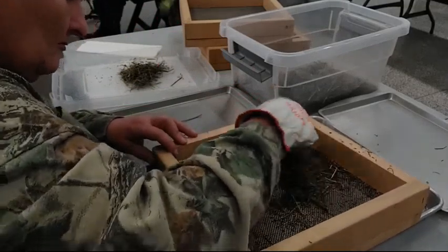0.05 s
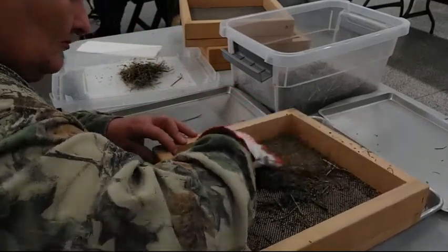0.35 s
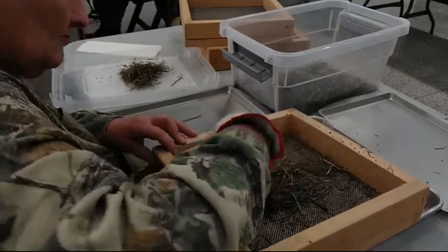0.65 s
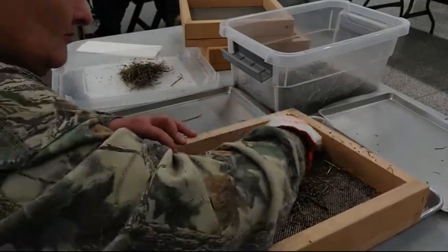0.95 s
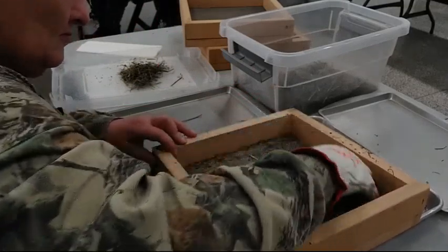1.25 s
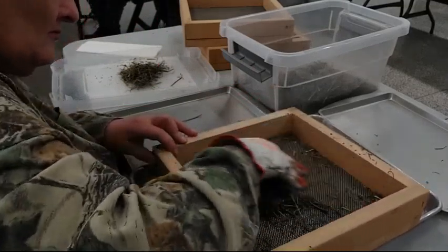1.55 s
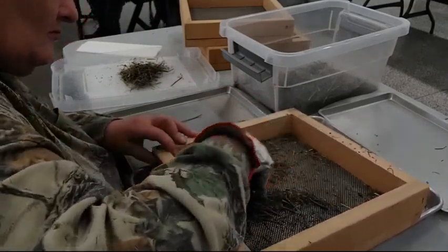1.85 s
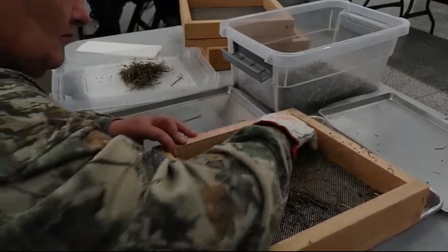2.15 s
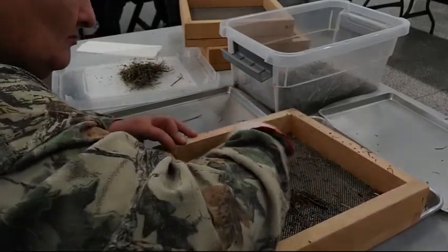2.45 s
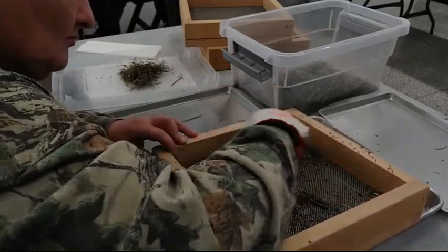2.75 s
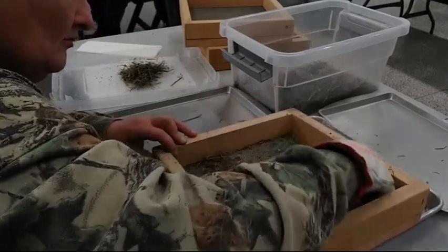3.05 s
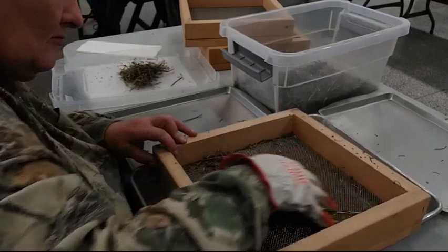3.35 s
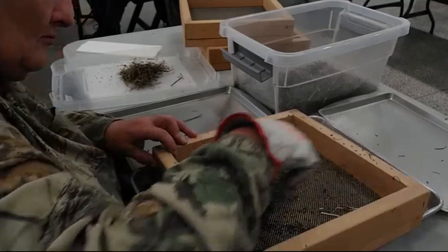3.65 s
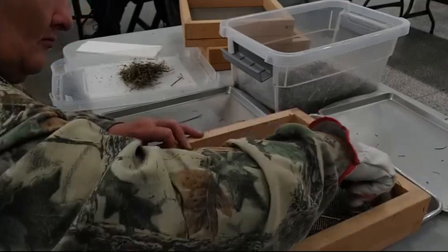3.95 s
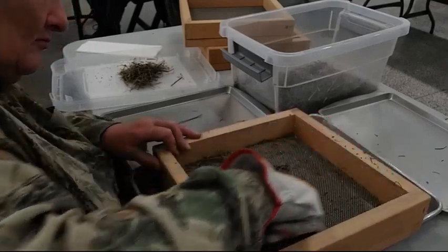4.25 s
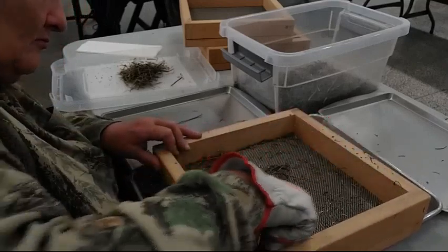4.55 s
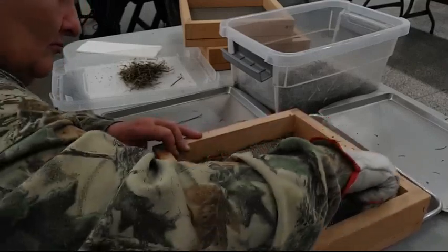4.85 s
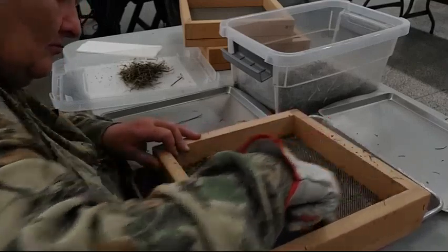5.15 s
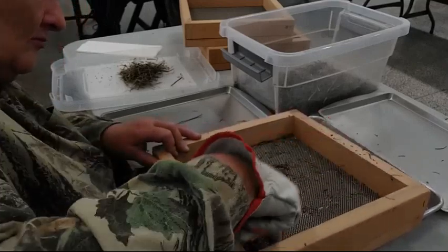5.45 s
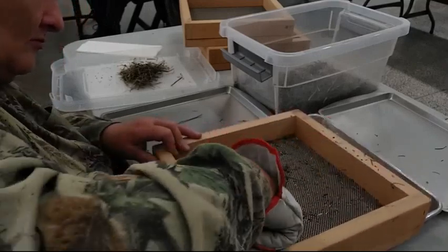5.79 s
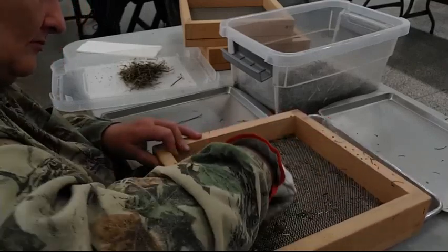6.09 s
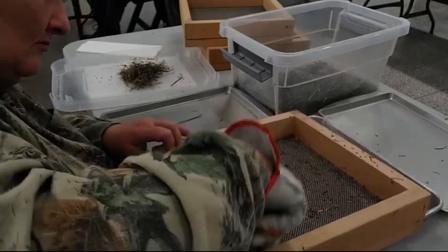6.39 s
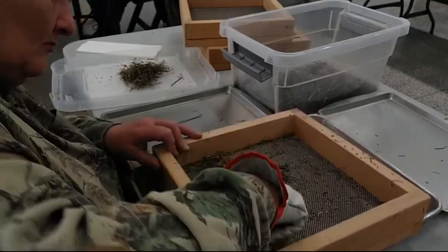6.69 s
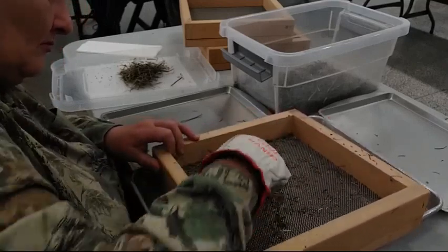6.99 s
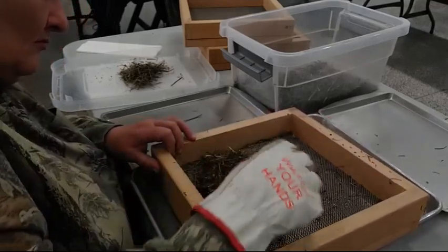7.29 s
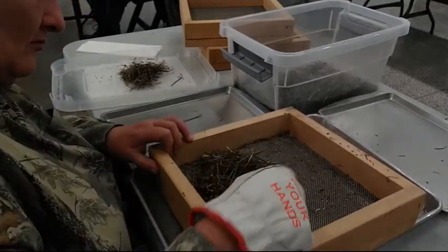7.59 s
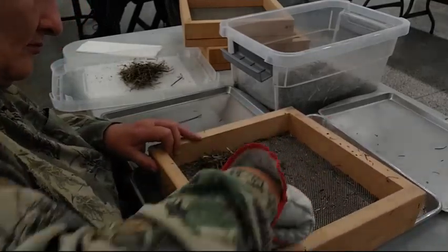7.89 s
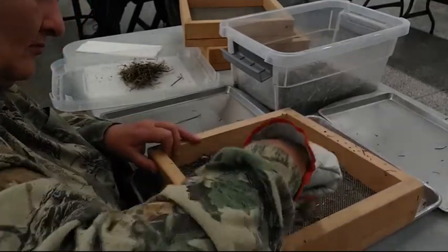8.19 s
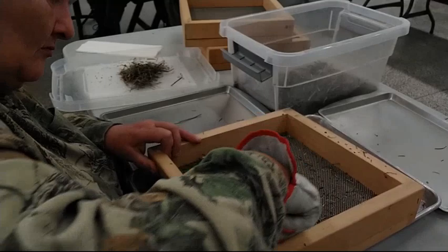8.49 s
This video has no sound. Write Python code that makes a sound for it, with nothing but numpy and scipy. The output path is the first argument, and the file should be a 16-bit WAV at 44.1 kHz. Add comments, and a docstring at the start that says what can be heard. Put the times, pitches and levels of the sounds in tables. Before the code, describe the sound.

A gloved hand rubs dried seed heads back and forth over a wire screen in a wooden frame. Husks crackle and stalks rasp in uneven strokes, loudest early on with a few sharp snaps. The frame then knocks once on a metal tray, and softer strokes follow with dull thumps of the hand. It is heard close up in a quiet workroom with a low ventilation rumble.

```python
"""Dry crackling and rasping come in strokes, with soft thumps, a metallic knock and a low rumble behind.
A gloved hand rubs dried seed heads to and fro over a wire screen in a wooden frame, in a quiet workroom.
Husks crackle as they break, stalks rasp over the wires and now and then snap, and the hand thumps the
screen as it lands. The frame knocks on the metal tray under it, once clearly and later faintly.
The rumble is the room's ventilation."""
import sys
import numpy as np
from scipy import signal
from scipy.fft import rfft, irfft
from scipy.io import wavfile

SR = 44100
rng = np.random.default_rng(int(sys.argv[2]) if len(sys.argv) > 2 else 0)


def store_pcm(level_fs):
    """Save levels as 16-bit WAV."""
    pcm = np.round(np.clip(level_fs, -1, 1) * 32767).astype(np.int16)
    wavfile.write(sys.argv[1], SR, np.atleast_2d(pcm).T)


N = 376173
TIME = np.arange(N) / SR
FREQ = np.maximum(np.fft.rfftfreq(N, 1 / SR), 1)

# strokes of the hand: (start [s], speeding up [s], holding on [s], husk crackle [dB], wire rasp [dB],
# crispness of the top treble [dB], zip over the wires [dB])
STROKES = [ (0.085, .37, 0.094, -39.5, -47.5, -4, -52.5), (1.015, 0.2, 0.16, -46, -58.5, -8.5, -73.5),
           (1.432, 0.13, 0.27, -37.5, -46.5, -5, -53), (2.335, .23, 0.041, -47.5, -45, -20, -58),
           (2.913, 0.21, 0.026, -48, -60, -18, -58), (3.14, 0.3, 0.11, -44.5, -54.5, -9, -68),
           (4.025, 0.23, 0.25, -51.5, -58.5, -12.5, -73), (4.55, 0.18, 0.19, -56, -64.5, -27, -63),
           (4.985, .2, 0.23, -60.5, -64.5, -31, -59), (5.88, 0.24, 0.019, -48.5, -56, -8, -62.5),
           (6.53, 0.22, 0.2, -56, -61.5, -13, -60), (7.843, .25, 0.044, -53, -55, -19, -70), ]
# how a stroke swells: (starting depth below its top [dB], bend of the curve [power])
CRACKLE_SWELL, RASP_SWELL = (20.7, 1.46), (23, .85)


def husks(level_db, crisp_db, grip_db):
    """Husks break with clicks and short pitched ticks; harder rubbing breaks more of them."""
    # tone colour of crushed husks: (frequency [Hz], level [dB])
    colour = [(1500, -59), (2800, -9), (3600, -5.5), (4500, -6), (5600, -2.5), (6450, 0), (7400, -2.5),
              (9000, -2), (11000, -2), (12500, -6.5), (15500, -3)]
    breaks_per_s = 3000 * undb(0.18 * (level_db + 54))
    spectrum = rfft(clicks(breaks_per_s, scatter_db=-4.5))
    for hz in np.geomspace(4000, 14000, num=6):
        ticks = rfft(clicks(breaks_per_s / 4, scatter_db=-3.0))
        spectrum = spectrum + 1.03 * ticks * resonance(hz, width=hz / 4)
    crackle = unit(through(irfft(spectrum, N), response(colour)))
    # whole dry pods are crisp, chaff muffled under the glove is dull
    top_treble = irfft(rfft(crackle) / (1 + (9300 / FREQ) ** 8), N)
    crackle = crackle + top_treble * (undb(crisp_db + 3.0) - 1)
    return crackle * undb(level_db + grip_db)


def wire_rasp(level_db, grip_db):
    """Stalks catch on wire after wire and shake the screen, which rings at its own pitches."""
    # tone colour of stalks dragged over the screen: (frequency [Hz], level [dB])
    colour = [(40, -44.5), (75, 4.5), (115, 9), (200, 1), (430, -4), (850, -6), (1050, -3), (1200, -6.5),
              (1520, 1.5), (1730, -7), (2050, -1.5), (2450, -2), (3200, -3), (6000, -24.5)]
    # pitches at which the screen rings: (frequency [Hz], width [Hz], level [dB])
    screen_tones = [(325, 15, -16), (698, 210, 8.5), (1000, 120, -2.5), (1222, 140, 2), (1550, 78, 0.5),
                    (1900, 36, 4), (1960, 255, 5), (2660, 91, 5), (2870, 27, 8), (3553, 174, 7.5),
                    (4070, 330, -5), (6100, 60, -26)]
    scrape = unit(through(clicks(per_s=2600, scatter_db=3.2), response(colour)))
    shake = rfft(clicks(per_s=2200, scatter_db=0.5))
    # each pitch swells and fades as the hand crosses the spots where that vibration stands still
    ringing = sum(undb(db + 2.5 * wander(per_s=9)) * irfft(shake * resonance(hz, width), N)
                  for hz, width, db in screen_tones)
    return (scrape + undb(1) * unit(ringing)) * undb(level_db + grip_db)


def stroke_shape(start, rise, hold, swell):
    """A stroke's strength, 0 to 1: it swells as the hand speeds up, sags, and dies fast at the stop."""
    sag_db_per_s, stop_db_per_s, take_hold_s = 11.5, 230, .6
    depth_db, power = swell
    t = TIME - start
    swell_db = -depth_db * np.clip(1 - t / rise, 0, 1) ** power
    sag_db = -sag_db_per_s * np.clip(t - rise, 0, hold)
    stop_db = -stop_db_per_s * np.maximum(t - rise - hold, 0)
    touch = np.clip(t / take_hold_s + .5, 0, 1)
    return undb(swell_db + sag_db + stop_db) * touch


def rubbing():
    """Strokes and small finger moves set the strength over time of crackle, top treble and rasp."""
    # the fingers gather the heap: (time [s], length [s], level [dB])
    rustles = [(0.124, 0.0087, -68), (0.974, 0.031, -65), (1.015, 0.041, -60), (2.136, 0.015, -78.5),
               (2.281, 0.023, -62.5), (2.405, 0.033, -59.5), (2.943, 0.19, -60.5), (3.714, 0.13, -73.0),
               (3.923, 0.046, -65), (4.059, 0.034, -65), (5.767, 0.29, -66.5), (6.458, 0.1, -67.5),
               (6.71, 0.036, -63), (7.118, 0.087, -71), (7.43, 0.051, -73.5), (7.82, 0.014, -72.5),
               (7.965, 0.038, -63), (8.455, 0.012, -62)]
    sift_db, sift_fall_db_per_s = -27, 7.5
    crisp_rise_db_per_s, crisp_power = 7, 0.23
    parts = []
    for start, rise, hold, crackle_db, rasp_db, crisp_db, _ in STROKES:
        since_stop = TIME - start - rise - hold
        # loose chaff keeps sifting through after each stroke
        sifting = (since_stop > 0) * undb(sift_db - sift_fall_db_per_s * np.maximum(since_stop, 0))
        crush = np.hypot(stroke_shape(start, rise, hold, CRACKLE_SWELL), sifting)
        drag = np.hypot(stroke_shape(start, rise, hold, RASP_SWELL), sifting)
        # the sound gets crisper as pods come out from under the glove, and with firmer rubbing
        uncovered_db = crisp_rise_db_per_s * np.clip(since_stop + hold / 2, -hold, hold / 2)
        treble = undb(crackle_db + crisp_db + uncovered_db) * crush ** (1 + crisp_power)
        parts.append((undb(crackle_db) * crush, treble, undb(rasp_db) * drag))
    rustle, t = np.zeros(N), TIME[:SR]
    attack_s, rustle_crisp_db, rustle_rasp_db = 0.0035, -9, -4.5
    for s, length, db in rustles:
        release = fade(np.maximum(t - length, 0), t60=0.13)
        add(rustle, s, undb(db) * np.minimum(t / attack_s, 1) * release)
    parts.append((rustle, rustle * undb(rustle_crisp_db), rustle * undb(rustle_rasp_db)))
    return np.linalg.norm(parts, axis=0) + 1e-6


def zips():
    """Crossing evenly spaced wires makes a wavering groan whose pitch follows the hand's speed."""
    full_speed_wires_per_s, speed_power = 345, .08
    firmness_power = 3.4  # the zip needs a firm stroke
    out = np.zeros(N)
    waver = 1 + .055 * wander(per_s=160) + .06 * wander(per_s=16)
    pressure = undb(3 * wander(per_s=120) + 3 * wander(per_s=16))
    for start, rise, hold, *_, zip_db in STROKES:
        strength = stroke_shape(start, rise, hold, RASP_SWELL)
        moving = strength > .01
        hz = full_speed_wires_per_s * strength[moving] ** speed_power * waver[moving]
        phase = 2 * np.pi * np.cumsum(hz) / SR
        groan = undb(-2.5) * np.sin(phase) + np.sin(2 * phase)  # the upper octave is the louder note
        out[moving] += undb(zip_db) * strength[moving] ** firmness_power * groan
    return out * pressure


def snaps():
    """A pod or stalk breaks with a sharp crack and splinters on for a moment."""
    # the loudest breaks: (time [s], level [dB], centre frequency [Hz])
    breaks = [(0.291, -27, 8900), (0.2997, -26, 8600), (0.972, -38, 4200), (1.111, -40.5, 7460),
              (1.6327, -21, 8560), (1.6414, -16.5, 6540), (1.6763, -23, 6740), (1.7506, -26, 8550),
              (2.8736, -48, 6800), (3.2174, -34.5, 7700), (3.262, -30, 3350), (4.9332, -39.5, 3800),
              (5.5546, -49, 3050)]
    out, t = np.zeros(N), TIME[:2048]
    for s, db, hz in breaks:
        crack_and_splinters = fade(t, t60=.006) + undb(-14) * fade(t, t60=0.083)
        burst = rng.standard_normal(len(t)) * crack_and_splinters
        crack = irfft(rfft(burst) * resonance(hz, width=0.68 * hz, f=frequencies(len(t))) ** 2)
        add(out, s, undb(db - 2) * crack / np.abs(crack).max())
    return out


def thumps():
    """The padded hand pushes the screen like a drumhead and slaps the stalks."""
    # the hand lands: (time [s], boom [dB], slap of the glove [dB])
    landings = [(0.235, -66, -57), (1.461, -36.5, -40.5), (1.531, -40.5, -44), (3.239, -49, -50),
                (4.0, -39.5, -43.5), (5.557, -52, -55), (5.607, -53, -56.5), (5.852, -37, -37.5),
                (5.916, -45, -71), (6.600, -43, -46), (7.026, -44.5, -50.5), (7.229, -55, -83),
                (7.885, -42.5, -41), (7.913, -40, -39.5), (8.088, -44, -45), (8.192, -45.5, -48.5),
                (8.494, -61, -53.5)]
    # low tones of the stretched screen: (frequency [Hz], level [dB], time to fade by 60 dB [s])
    drum_tones = [(88, -13, .2), (112, -1, .34), (128, -7, .14), (147, -2, .26), (172, -9, .16),
                  (218, -12, .18)]
    # tone colour of the glove's slap: (frequency [Hz], level [dB])
    slap_colour = [(50, -33), (100, -8), (170, 1.5), (320, 0.5), (450, -0.5), (680, -1.5), (950, -11.5),
                   (1400, -15.5), (2100, -18), (3500, -27), (9000, -48)]
    out, t = np.zeros(N), TIME[:SR]
    boom = ring(drum_tones) * (1 - fade(t, t60=.05))
    slap_filter = response(slap_colour)
    for s, boom_db, slap_db in landings:
        contact = rng.standard_normal(SR) * fade(t, t60=0.11) * (1 - fade(t, t60=0.026))
        add(out, s, undb(boom_db) * boom + undb(slap_db) * through(contact, slap_filter))
    return out


def tray_knocks():
    """Wood hits the metal tray: a dull clack, long low tones and a shimmer of many crowded ones."""
    # the frame strikes and chatters: (time [s], ringing [dB], clack [dB], clack frequency [Hz])
    hits = [(2.6093, -34, -30, 513), (2.6164, -45, -27.5, 640), (2.63, -56, -24, 2890),
            (7.916, -66, -43.5, 590), (8.086, -61, -33, 280), (8.494, -63, -45, 604)]
    # tones of tray and frame: (frequency [Hz], level [dB], time to fade by 60 dB [s])
    tray_tones = [(104, -22, .6), (222, -12, .6), (262, -11, .6), (280, -12, .5), (346, -3, .35),
                  (372, 0, .95), (396, -3, .25), (473, -10, .55), (597, -12, .75), (647, -11, .4),
                  (755, -13, .25), (797, -12, .2), (847, -16, .25), (1261, -24, .5), (1353, -24, .5),
                  (1760, -23, .45)]
    # tone colour of the tray's shimmer: (frequency [Hz], level [dB])
    shimmer_colour = [(50, -40), (120, 0), (370, 12.5), (500, 8.5), (650, 3.5), (1000, -8.5), (1900, -12.5),
                      (2300, -6), (2900, -2), (3500, -17), (5000, -18), (9000, -35), (15000, -40)]
    judder_db = 3.5
    out, t = np.zeros(N), TIME[:SR]
    shimmer_fade = undb(-8) * fade(t, t60=1.41) + undb(-8.5) * fade(t, t60=0.069)
    for s, ring_db, clack_db, hz in hits:
        shimmer = through(rng.standard_normal(SR) * shimmer_fade, response(shimmer_colour))
        clack = np.sin(2 * np.pi * hz * t) * fade(t, t60=.02) * (1 - fade(t, t60=.003))
        # the loose tray judders, so each tone's level wobbles on its own
        tones = sum(ring([tone]) * undb(judder_db * wander(per_s=40, size=SR)) for tone in tray_tones)
        add(out, s, undb(ring_db) * (shimmer - tones) - undb(clack_db) * clack)
    return cut_bass(out, hz=150, order=2)  # the thin tray gives off little bass


def singing_wire():
    """A wire brushed or plucked by the glove sings a thin, scratchy note."""
    # touches of the wire: (time [s], length [s], level [dB])
    touches = [(1.466, .009, -37), (7.174, 0.079, -69.5), (7.46, 0.064, -62), (7.885, 0.0077, -49),
               (7.92, 0.009, -64)]
    swell = sum(undb(db) * np.exp(-(2 * (TIME - s) / length) ** 2) for s, length, db in touches)
    hz = 3590 + 160 * wander(per_s=700)
    note = np.sin(2 * np.pi * np.cumsum(hz) / SR)
    flicker = undb(4 * wander(per_s=300))
    return swell * unit(note * flicker)


def reflections(near_db, room_db):
    """Quick echoes come from frame, bins and table, then the room rings on, shortest in the treble."""
    # how long the room rings: (frequency [Hz], time to fade by 60 dB [s])
    room_fade = [(100, .45), (500, .55), (2000, .5), (6000, .35), (15000, .25)]
    t = TIME[:SR // 2]
    near = rng.standard_normal(len(t)) * fade(t, t60=0.04) * (t > .001)
    near = cut_bass(near, hz=600, order=1)  # small surfaces reflect little bass
    noise = rfft(rng.standard_normal(len(t)))
    octave = np.log2(np.clip(frequencies(len(t)), 125, 16000) / 125)
    tail = np.zeros(len(t))
    for k in range(8):
        band = irfft(noise * np.maximum(1 - abs(octave - k), 0), len(t))
        tail += band * fade(t, value_at(room_fade, 125 * 2 ** k)) * (t > .012)
    return undb(near_db) * near / np.linalg.norm(near) + undb(room_db) * tail / np.linalg.norm(tail)


def workroom(mid, side):
    """The screen's sound and its echoes arrive left and right, on the right a little later."""
    # how far the right side lags: (frequency [Hz], phase [radians])
    right_lag = [(0, 0), (750, .25), (1150, .9), (2000, 1.3), (3000, 2.7), (5000, 4.4), (6300, 5.9),
                 (7000, 6.28), (16000, 6.28)]
    # the left is brighter in the low treble: (frequency [Hz], left minus right [dB])
    balance = [(200, -0.5), (700, -1.5), (1300, 0.5), (2400, 0.1), (4400, 4.5), (8000, 1), (15000, -2.5)]
    echoes = stereo(*(reflections(near_db=-10, room_db=-11.5) for _ in range(2)))
    left, right = stereo(mid, side) + np.array([through(mid, echo) for echo in echoes])
    tilt = undb(value_at(balance, FREQ) / 2)
    delay = np.exp(-1j * np.interp(FREQ, *np.transpose(right_lag)))
    both = irfft(np.array([rfft(left) * tilt, rfft(right) * delay / tilt]), N)
    return undb(2.36) * cut_bass(both, hz=60, order=3)  # an open screen gives off almost no deep bass


def ventilation():
    """Moving air makes a steady rumble with a faint hiss."""
    # tone colour of the air: (frequency [Hz], level [dB])
    colour = [(15, -61), (25, -31), (99, 0.5), (164, -5), (209, -8.5), (359, -15.5), (421, -15),
              (469, -20.5), (509, -19.5), (631, -18.5), (919, -25), (1490, -26.5), (2490, -30), (7500, -34),
              (15500, -42)]
    gain = undb(value_at(colour, FREQ))
    mid, side = (unit(irfft(rfft(rng.standard_normal(N)) * gain, N)) for _ in range(2))
    return stereo(mid, side) * undb(-60.5)


def stereo(mid, side):
    """Make left and right from what they share (mid) and what sets them apart (side)."""
    # width of the sound, narrow in the bass: (frequency [Hz], gain of the side signal [dB])
    spread = [(30, -12), (70, -21), (130, -16), (300, -5), (700, -4.5), (1500, -3.5), (2500, -2.5),
              (4800, -2), (7000, -10), (14000, -10)]
    side = irfft(rfft(side) * undb(value_at(spread, frequencies(len(side)))), len(side))
    return np.array([mid + side, mid - side])


def clicks(per_s, scatter_db):
    """Tiny contacts at random times; the further scatter_db is from 0, the more their sizes vary."""
    happens = rng.random(N) < per_s / SR
    size = undb(scatter_db * np.minimum(rng.exponential(size=N), 5))
    return unit(happens * size * rng.choice([-1, 1], N))


def wander(per_s, size=N):
    """A random curve, typically within about 1 of zero, that turns per_s times a second."""
    steps = rng.standard_normal(size // 20)
    return 1.2 * np.interp(TIME[:size] * per_s, np.arange(len(steps)), steps)


def ring(tones):
    """One second of a struck object's fading tones."""
    t = TIME[:SR]
    return sum(undb(db) * np.sin(2 * np.pi * hz * t) * fade(t, t60) for hz, db, t60 in tones)


def resonance(hz, width, f=FREQ):
    """A filter curve that favours one pitch, with gain 1 at its centre."""
    return 1 / (1 + 1j * (f / hz - hz / f) * hz / width)


def response(colour, size=4096):
    """A short click of energy 1 with the given tone colour, for use as a filter."""
    cepstrum = irfft(value_at(colour, frequencies(size)) * np.log(10) / 20)
    # folding the second half onto the first packs the energy at the click's start
    cepstrum[1:size // 2] *= 2
    cepstrum[size // 2 + 1:] = 0
    click = irfft(np.exp(rfft(cepstrum)))
    return click / np.linalg.norm(click)


def through(x, impulse):
    """Pass a sound through a filter or echo, keeping its length."""
    return signal.fftconvolve(x, impulse)[:len(x)]


def cut_bass(x, hz, order):
    """Weaken everything below hz; a higher order cuts more steeply."""
    return signal.sosfilt(signal.butter(order, hz, "high", fs=SR, output="sos"), x)


def frequencies(size):
    """The frequencies in the spectrum of size samples, no lower than 1 Hz."""
    return np.maximum(np.fft.rfftfreq(size, 1 / SR), 1)


def value_at(points, hz):
    """Look up a (frequency, value) table, blending between rows along a pitch scale."""
    f, value = np.transpose(points)
    return np.interp(np.log(hz), np.log(f), value)


def fade(t, t60):
    """Die away by 60 dB every t60 seconds."""
    return np.exp(-np.log(1000) * t / t60)


def undb(db):
    """Turn decibels into a gain."""
    return 10 ** (np.asarray(db) / 20)


def unit(x):
    """Scale to an average (rms) level of 1."""
    return x / np.sqrt(np.mean(x ** 2))


def add(out, s, sound):
    """Mix a sound in at s seconds."""
    i = max(int(s * SR), 0)
    out[i:i + len(sound)] += sound[:N - i]


def scene():
    """All the sounds of the screen play in the workroom, over the ventilation."""
    crackle_db, treble_db, rasp_db = 20 * np.log10(rubbing())
    # the glove grips and slips unevenly, which shakes crackle and rasp together
    grip_db = .6 * wander(per_s=50) + .8 * wander(per_s=170) + .3 * wander(per_s=18)
    # contacts are spread over the screen, so left and right each get their own mixture
    mid, side = (husks(crackle_db, treble_db - crackle_db, grip_db) + wire_rasp(rasp_db, grip_db)
                 for _ in range(2))
    mid = mid + snaps() + zips() + thumps() + tray_knocks() + singing_wire()
    return workroom(mid, side) + ventilation()


def record(dry):
    """Cut off the very highest treble."""
    top_hz = 15800
    return signal.sosfilt(signal.ellip(12, .1, 75, top_hz, fs=SR, output="sos"), dry)


dry = scene()
out = record(dry)
store_pcm(out)
```